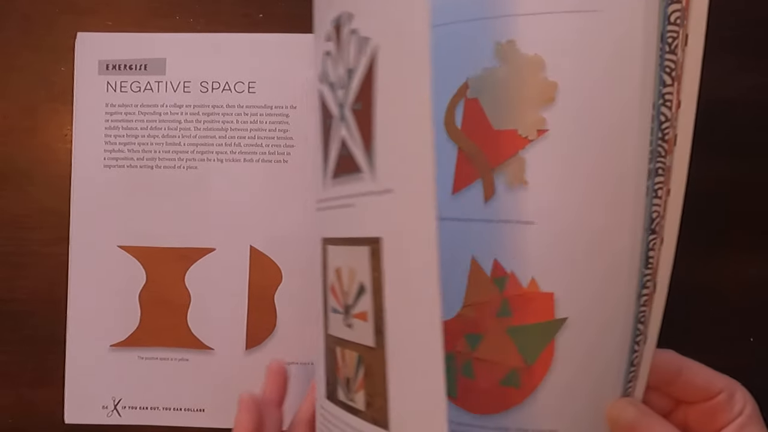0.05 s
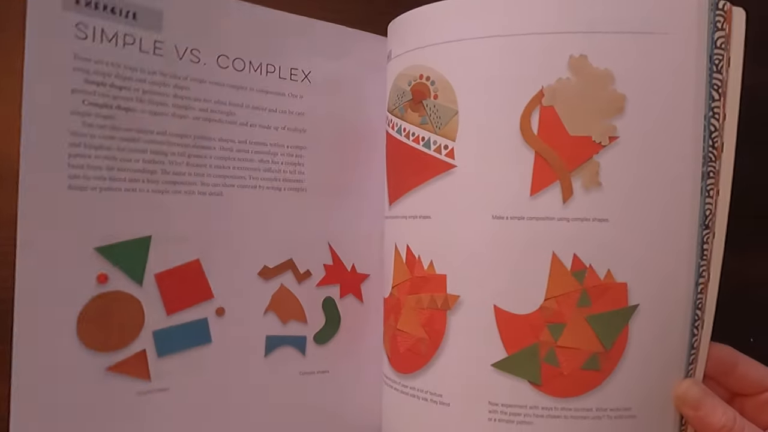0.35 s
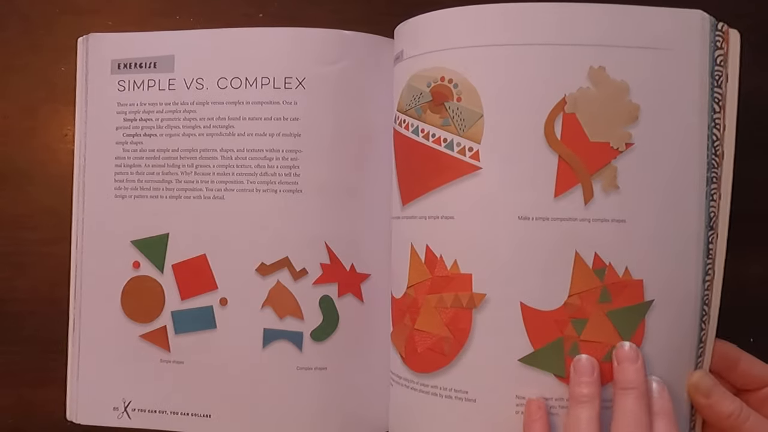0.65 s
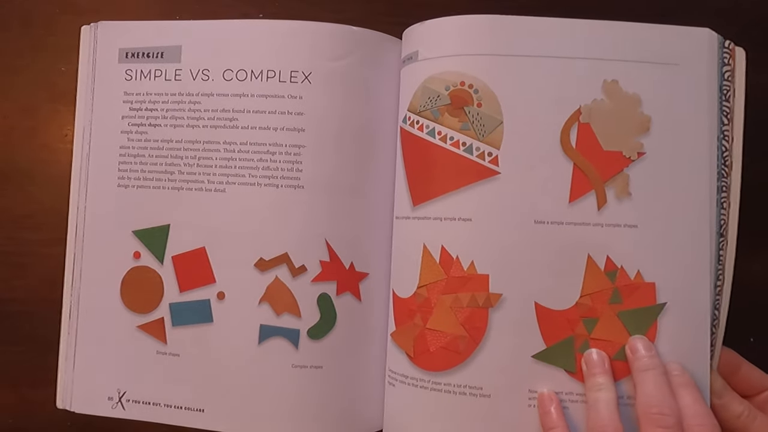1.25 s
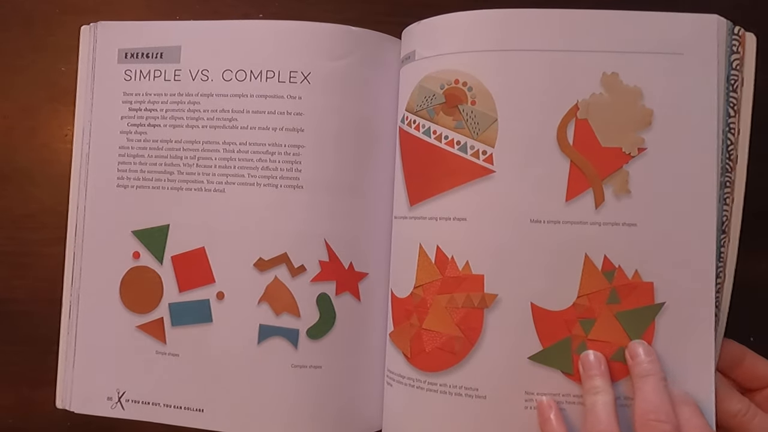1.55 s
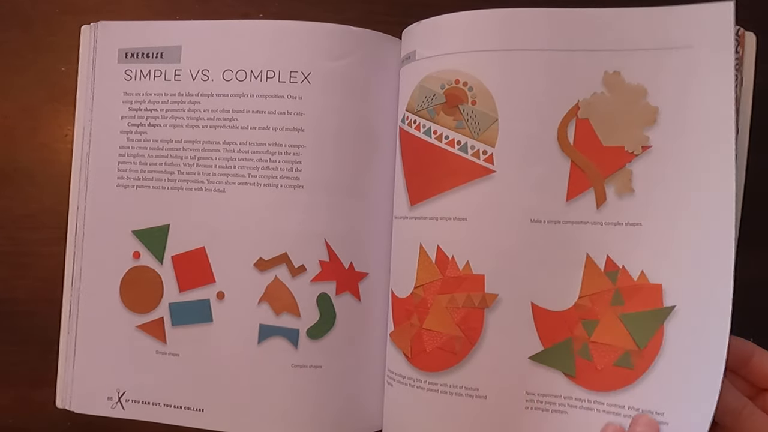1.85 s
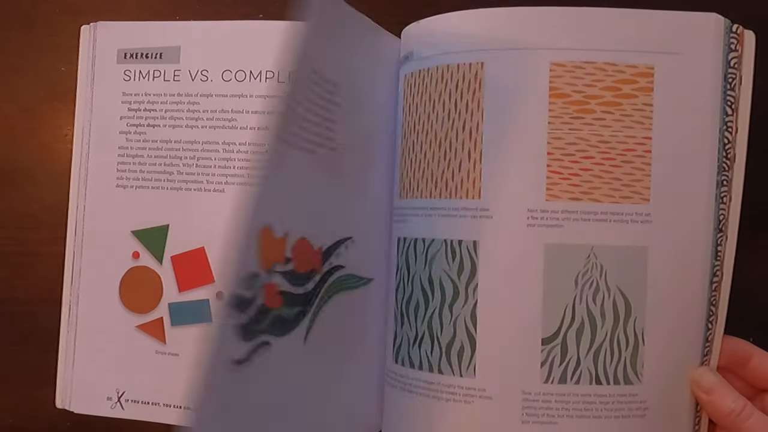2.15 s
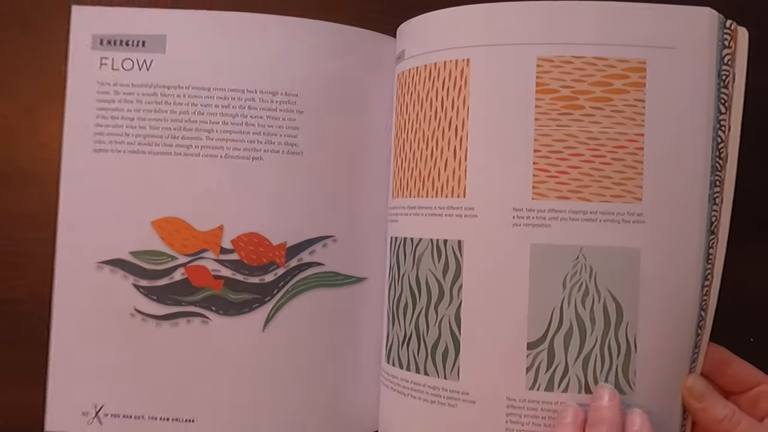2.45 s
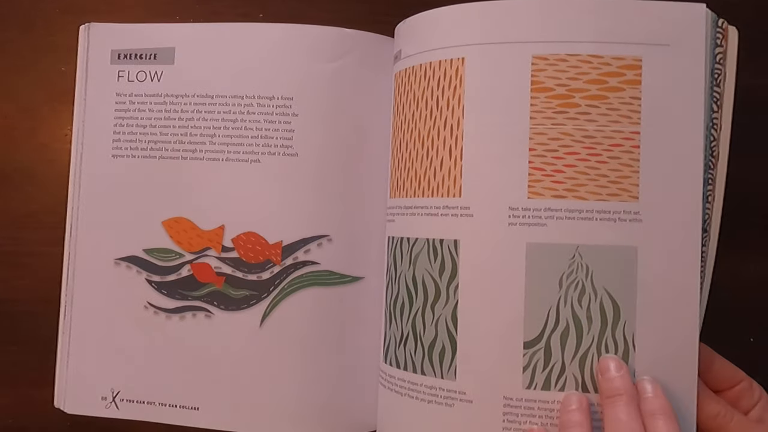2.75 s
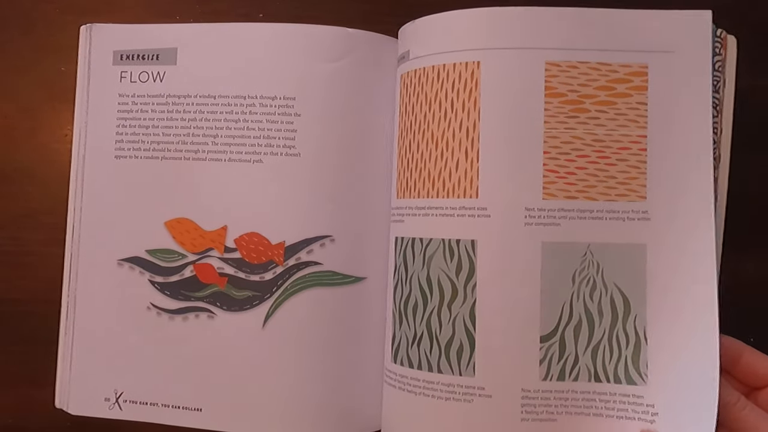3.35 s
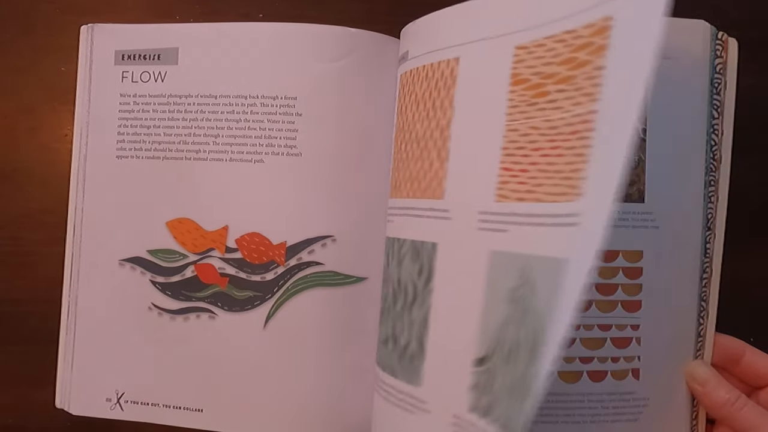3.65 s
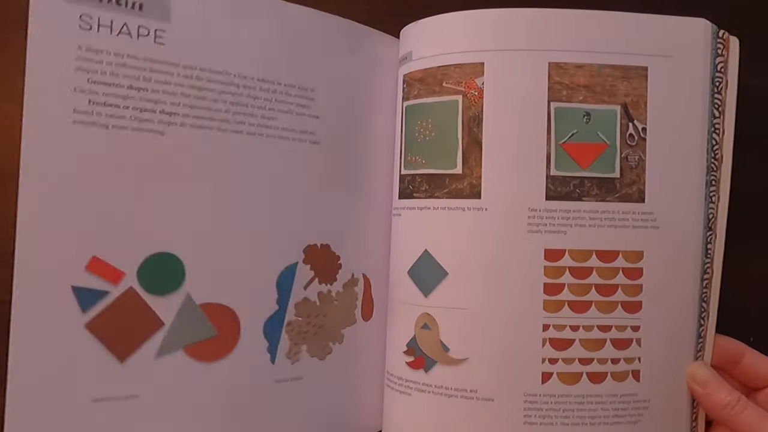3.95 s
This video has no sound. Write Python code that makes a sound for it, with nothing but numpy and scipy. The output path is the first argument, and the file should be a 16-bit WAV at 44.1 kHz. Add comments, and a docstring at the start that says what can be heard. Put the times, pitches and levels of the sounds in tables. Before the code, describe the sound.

Stiff book pages are turned close up in a quiet room. The first flops over with a dull flutter at about 0.5 seconds, followed by faint finger slides. A corner pops free sharply at 1.7 seconds, and the page swishes over, landing with a soft slap around 2.4. Fingers rub and tick on the paper again, then a third page sweeps over and slaps down near 3.9 seconds.

```python
"""Turning stiff pages, close up

A large book on a table in a quiet room, a stereo microphone close to the paper.
Fingers slide with a hiss of catching fibres, edges tick, a corner buckles free with a pop.
Each sheet sweeps off its neighbour and flops over with a dull flutter that rings the book;
some land with a slap or a puff of air."""
import sys
import numpy as np
from scipy import signal
from scipy.fft import rfft, irfft
from scipy.io import wavfile
from scipy.ndimage import uniform_filter1d

SR = 44100
rng = np.random.default_rng(int(sys.argv[2]) if len(sys.argv) > 2 else 0)


def wav_out(sig):
    """Save sig, one row per channel (or a flat mono array), as 16-bit PCM at SR to the path in sys.argv[1]."""
    wavfile.write(sys.argv[1], SR, np.round(np.clip(np.atleast_2d(sig).T, -1, 1) * 32767).astype(np.int16))


N = 176400


def amp(db):
    """Decibels to gain."""
    return 10 ** (np.asarray(db) / 20)


def unit(x):
    """Scales to rms 1."""
    return x / np.sqrt(np.mean(x ** 2) + 1e-20)


def read(points, hz):
    """Reads a table on a log-frequency axis."""
    f, value = np.transpose(points)
    return np.interp(np.log(hz + 1), np.log(f + 1), value)


def bins(x):
    """Frequencies of the spectrum of x, raised 1 Hz to avoid zero."""
    return np.fft.rfftfreq(x.shape[-1], 1 / SR) + 1


def tint(x, db):
    """Colours x by a gain per frequency, at rms 1."""
    return unit(irfft(rfft(x) * amp(db), x.shape[-1]))


def add(mix, start, sound):
    """Mixes a sound in at a time in seconds."""
    at = round(start * SR)
    part = mix[max(at, 0):][:len(sound) + min(at, 0)]
    part += sound[max(-at, 0):][:len(part)]


def add_burst(mix, x, peak, rise, decay, db):
    """Mixes x in, swelling to the peak time and dying away."""
    t = (np.arange(len(x)) - len(x) // 2) / SR
    envelope = np.exp(np.minimum(t / rise, -t / decay))
    add(mix, peak - len(x) / 2 / SR, amp(db) * x * envelope)


def grains(per_s=18000, spread_db=1, size=32768):
    """A train of tiny slips of uneven strength."""
    slips = rng.standard_normal(size) * (rng.random(size) < per_s / SR)
    return slips * amp(spread_db * np.minimum(rng.exponential(1, size), 4))


# The quiet room behind the book: (frequency [Hz], relative level [dB])
ROOM_TONE_COLOUR = [(20, -18), (55, -16.5), (118, -24), (160, -2.5), (280, -4), (380, -13), (820, -20.5),
                    (945, -9), (1060, -11.5), (1270, -10.5), (2600, -26), (3500, -32), (7000, -32),
                    (8500, -45.5), (12500, -49.5), (15000, -59)]
# How alike it is on both sides of the microphone: (frequency [Hz], shared power [0-1])
ROOM_TONE_LIKENESS = [(50, 0.86), (180, 0.59), (3000, 0.49)]
def room_tone():
    """Steady soft rush of the room, its bass mostly shared by both channels."""
    noise = rfft(rng.standard_normal((3, N)))
    hz = bins(np.zeros(N))
    shared = read(ROOM_TONE_LIKENESS, hz)
    stereo = irfft(np.sqrt(shared) * noise[0] + np.sqrt(1 - shared) * noise[1:], N)
    return amp(-62.5) * tint(stereo, read(ROOM_TONE_COLOUR, hz))


# Reverberation around the table: (frequency [Hz], time to fall 60 dB [s])
ROOM_DECAY = [(150, 0.5), (600, 0.53), (2000, 0.29), (6000, 0.32), (14000, 0.27)]
# The left channel trails the right: (frequency [Hz], phase lag [rad])
LEFT_LAG = [(500, 0.032), (3000, 0.86), (6000, 0.5)]
def in_room(x, right_db, room_db):
    """Close sound, right of centre, with a short diffuse tail that differs in each channel."""
    hz, t, noise = signal.stft(rng.standard_normal((2, SR // 2)), SR, nperseg=256)
    decay = amp(-60 * t / read(ROOM_DECAY, hz)[:, None])
    tail = signal.istft(noise * decay, SR, nperseg=256)[1]
    tail[:, :130] = 0  # 3 ms before the first reflection
    wet = signal.fftconvolve(x[None], tail / np.linalg.norm(tail[0]), axes=1)[:, :N]
    left = irfft(rfft(x) * np.exp(-1j * read(LEFT_LAG, bins(x))), N)
    direct = np.array([left, x]) * amp([[-right_db / 2], [right_db / 2]])
    return direct + amp(room_db) * wet


def rub(colour, length, rise, fade, db, centre_hz, tilt_db, *, lift_db, width_oct, dip_db, below_oct):
    """Fibres catch and slip in one stroke; the sheet radiates them through a peak with a dip below."""
    slips = grains()
    t, hz = np.arange(len(slips)) / SR, bins(slips)
    octaves = np.log2(hz / centre_hz)
    peak = lift_db * np.exp(-.5 * (octaves / width_oct) ** 2)
    dip = dip_db * np.exp(-(2 * (octaves / below_oct + 1)) ** 2)
    hiss = tint(slips, read(colour, hz) + tilt_db * np.maximum(octaves, -3) + peak - dip)
    waver_db = unit(uniform_filter1d(rng.standard_normal(len(t)), size=400))
    envelope = np.minimum(t / rise, 1) * np.exp(-np.maximum(t - length, 0) / fade)
    return hiss * amp(db + waver_db) * envelope


# Skin on paper, heard close: (frequency [Hz], relative level [dB])
FINGER_COLOUR = [(150, -22.5), (600, -17), (1500, -10), (2600, -8), (3300, -3), (4700, 0.5), (7200, -2.5),
                 (8500, -10), (12300, -16), (15000, -36)]
# Strokes: (start [s], length [s], rise [s], fade [s], level [dB], centre [Hz], tilt [dB/octave])
FINGER_STROKES = [(0.175, 0.075, 0.03, 0.004, -63.5, 6440, 1),
                  (0.695, 0.023, 0.0023, 0.064, -50.5, 5200, -3.5),
                  (0.835, 0.069, 0.021, 0.0095, -66, 5540, -3), (1.038, 0.06, 0.077, 0.047, -63.5, 5770, 0),
                  (1.14, 0.067, 0.034, 0.072, -68.5, 7900, -1.5),
                  (1.465, 0.062, 0.037, 0.039, -71.5, 7240, -1), (1.541, 0.12, 0.064, 0.021, -58, 6500, 1),
                  (1.798, 0.11, 0.03, 0.011, -55, 6030, -3.5),
                  (1.832, 0.014, 0.0038, 0.0083, -46, 4060, -1), (2.619, 0.05, 0.0038, 0.12, -62, 5140, -2),
                  (2.748, 0.093, 0.032, 0.017, -61, 5000, -4.5),
                  (2.908, 0.15, 0.037, 0.024, -64, 5260, 1.2), (3.039, 0.1, 0.022, 0.13, -60, 5570, 3),
                  (3.778, 0.057, 0.063, 0.006, -54, 5700, 0), (3.876, 0.012, 0.0027, 0.0071, -52, 4400, 1)]
def finger_slides():
    """Fingertips rub the page with a thin, high hiss."""
    out = np.zeros(N)
    for start, *stroke in FINGER_STROKES:
        hiss = rub(FINGER_COLOUR, *stroke, lift_db=5.2, width_oct=0.13, dip_db=6, below_oct=0.61)
        add(out, start, hiss)
    return out


# Paper on paper, heard close: (frequency [Hz], relative level [dB])
SHEET_COLOUR = [(150, -13), (750, -11), (1300, -4), (2000, 1), (2600, -5.5), (3400, -2.5), (4400, -4),
                (7200, -4.5), (8500, -14), (12000, -19.5), (15000, -39)]
# Sheets passing the microphone: (start [s], length [s], rise [s], fade [s], level [dB],
# centre [Hz], tilt [dB/octave], reflection delay [s])
SHEET_STROKES = [(0, 0.079, 0.0011, 0.033, -58, 3040, 1, 0.00079),
                 (0.091, 0.37, 0.018, 0.078, -76, 5560, -2, 0.00062),
                 (0.69, 0.013, 0.0037, 0.081, -55, 1760, 3.5, 0.0011),
                 (0.994, 0.13, 0.022, 0.04, -64, 1370, -3.5, 0.0009),
                 (1.60, 0.074, 0.076, 0.091, -53.5, 2080, -2.5, 0.001),
                 (1.937, 0.087, 0.031, 0.06, -56.5, 1930, -1, 0.00061),
                 (2.074, 0.084, 0.016, 0.098, -57, 1520, -1, 0.00072),
                 (2.144, 0.083, 0.037, 0.0072, -56.5, 2870, 4, 0.0006),
                 (3.062, 0.083, 0.035, 0.038, -58, 3580, 4, 0.00052),
                 (3.164, 0.09, 0.0019, 0.072, -52.5, 3470, 2.5, 0.00047),
                 (3.377, 0.065, 0.05, 0.021, -62, 2390, -1.5, 0.00054),
                 (3.665, .14, 0.079, 0.016, -59, 1380, -2.5, 0.00063),
                 (3.806, 0.051, 0.024, 0.061, -54.5, 2240, 1.5, 0.00078)]
def sheet_sweeps():
    """A sheet rubs over its neighbour; the reflection off it comes later as it lifts."""
    out = np.zeros(N)
    for start, *stroke, delay in SHEET_STROKES:
        swish = rub(SHEET_COLOUR, *stroke, lift_db=7.3, width_oct=0.59, dip_db=1.2, below_oct=0.44)
        t = np.arange(len(swish)) / SR
        reflection = np.interp(t - delay - 0.0011 * t, t, swish)
        add(out, start, swish + 0.28 * reflection)
    return out


# Air reaching the microphone: (time [s], level [dB])
AIR_PUFFS = [(0.418, -44.5), (0.496, -55), (2.37, -52.5), (2.425, -52)]
def air_puffs(decay_s=0.0055, cutoff_hz=175):
    """A landing page pushes out the air beneath it in a low puff."""
    out = np.zeros(N)
    for peak, db in AIR_PUFFS:
        noise = grains()
        air = tint(noise, -20 * np.log10(1 + (bins(noise) / cutoff_hz) ** 3))
        add_burst(out, air, peak, decay_s / 2, decay_s, db)
    return out


# A paper edge, heard close: (frequency [Hz], relative level [dB])
EDGE_COLOUR = [(120, -34.5), (600, 1.5), (3200, 7), (4800, 5.5), (7300, -2), (10000, -6.5), (12500, -22),
               (15000, -30)]
# Flicks: (time [s], rise [s], decay [s], level [dB], treble tilt [dB/octave])
EDGE_FLICKS = [(0.679, 0.00051, 0.0065, -47.5, -4.5), (1.03, 0.00027, .002, -56.5, 5.5),
               (1.6527, 0.0011, 0.0019, -33, 5), (1.6553, 0.0019, 0.0021, -32, -5.5),
               (2.223, 0.0011, 0.0027, -50, 2), (2.733, 0.00061, 0.00085, -37, -0.3),
               (3.165, 0.002, 0.0064, -41, 2)]
def edge_ticks():
    """Paper edges flick past a finger in brief crackles; the two near 1.65 s are the crackle of the corner
    buckling free."""
    out = np.zeros(N)
    for *burst, tilt_db in EDGE_FLICKS:
        slips = grains()
        hz = bins(slips)
        crackle = tint(slips, read(EDGE_COLOUR, hz) + tilt_db * np.log2(1 + hz / 1000))
        add_burst(out, crackle, *burst)
    return out


# The jolted book on the table: (frequency [Hz], gain [dB])
JOLT_COLOUR = [(70, -24), (220, 7.5), (420, -11), (1000, -1), (2000, -10), (5000, -39)]
def corner_snap(pop_hz=1980, width_s=0.00033):
    """One corner buckles free with a pop that jolts the book."""
    out = np.zeros(N)
    t = np.arange(-128, 129) / SR
    pop = np.cos(2 * np.pi * pop_hz * t) * np.exp(-.5 * (t / width_s) ** 2)
    add(out, 1.6538 + t[0], amp(-20) * pop)
    hz = abs(np.fft.fftfreq(4096, 1 / SR))
    log_gain = np.log(amp(read(JOLT_COLOUR, hz)))
    knock = np.fft.ifft(np.exp(signal.hilbert(log_gain).conj())).real  # minimum phase: a sudden onset
    add(out, 1.6553, amp(-3) * knock)
    return out


# Resonances of the book on the table: (frequency [Hz], width [Hz], lift [dB])
BOOK_MODES = [(170.5, 24, 8), (344, 130, 2), (560, 66, 5.5), (677, 67, 4.5), (753, 79, 2), (840, 43, -7),
              (904, 31, 0.5), (1144, 230, 5.5)]
# Pages falling near the microphone, and at 1.658 s the book ringing after the corner snap: # (time [s], rise
# [s], decay [s], level [dB], low edge [Hz], high edge [Hz])
PAGE_FLOPS = [(0.437, 0.0098, 0.12, -47.5, 165, 734), (.49, 0.01, 0.024, -39, 152, 1114),
              (0.6149, 0.0063, 0.023, -41.5, 380, 1290), (1.135, 0.066, 0.052, -60, 180, 706),
              (1.658, 0.002, 0.027, -49, 536, 1110), (2.236, 0.0054, 0.032, -38, 305, 1760),
              (2.261, 0.0081, 0.065, -44, 332, 1660), (2.384, 0.006, 0.0082, -42.5, 253, 560),
              (2.391, 0.0047, 0.011, -37.5, 595, 1930), (2.424, 0.019, 0.046, -37.5, 155, 1330),
              (2.432, 0.0063, 0.023, -36, 513, 1790), (3.933, 0.022, 0.031, -39, 700, 1860),
              (3.945, 0.028, 0.055, -39.5, 584, 1050), (3.955, 0.044, 0.023, -52.5, 183, 293)]
def page_flops(low_order=6.3, high_order=6.13):
    """The sheet bends and lands, fluttering in dull bursts that ring the book."""
    out = np.zeros(N)
    for *burst, low_hz, high_hz in PAGE_FLOPS:
        slips = grains(per_s=5000, spread_db=-1)
        hz = bins(slips)
        low_cut_db = -10 * np.log10(1 + (low_hz / hz) ** (2 * low_order))
        high_cut_db = -10 * np.log10(1 + (hz / high_hz) ** (2 * high_order))
        book_db = sum(db / (1 + (2 * (hz - f) / width) ** 2) for f, width, db in BOOK_MODES)
        flutter = tint(slips, low_cut_db + high_cut_db + book_db)
        flutter /= np.sqrt(uniform_filter1d(flutter ** 2, size=500) + 1e-6)  # evens out the level
        add_burst(out, flutter, *burst)
    return out


# Pages striking the book: (time [s], rise [s], decay [s], level [dB], pitch [Hz])
PAGE_SLAPS = [(1.1069, 0.001, 0.0045, -46.5, 620), (2.385, 0.0051, 0.0083, -35.5, 543.4),
              (2.4315, 0.0026, 0.0064, -29.5, 1215), (3.927, 0.003, 0.0061, -26, 760)]
def page_slaps():
    """The bowed sheet slaps down and rings briefly at one pitch."""
    out = np.zeros(N)
    t = np.arange(SR // 2) / SR
    for *burst, pitch_hz in PAGE_SLAPS:
        add_burst(out, np.sin(2 * np.pi * pitch_hz * t), *burst)
    return out


def scene():
    """The book close up and slightly to the right, the quiet room behind it."""
    rubbing = in_room(finger_slides() + sheet_sweeps(), right_db=1.2, room_db=-11.5)
    landings = in_room(page_flops() + page_slaps() + air_puffs(), right_db=0.5, room_db=-15)
    snaps = in_room(edge_ticks() + corner_snap(), right_db=2.5, room_db=-11.5)
    return room_tone() + rubbing + landings + snaps


def record(dry):
    """The recorder cuts the treble above 15.4 kHz."""
    lowpass = signal.firwin(511, 15400, window=("kaiser", 9), fs=SR)
    return signal.oaconvolve(dry, lowpass[None], "same")


dry = scene()
out = record(dry)
wav_out(out)
```